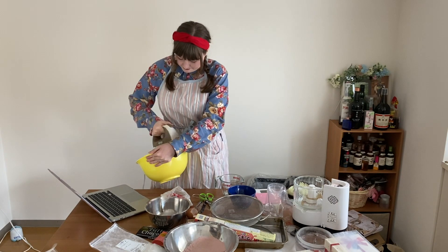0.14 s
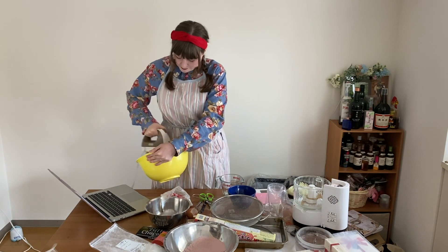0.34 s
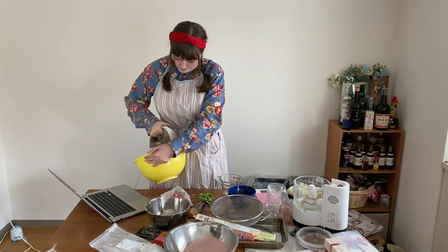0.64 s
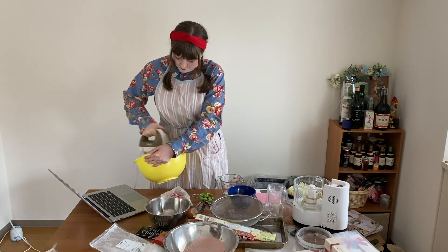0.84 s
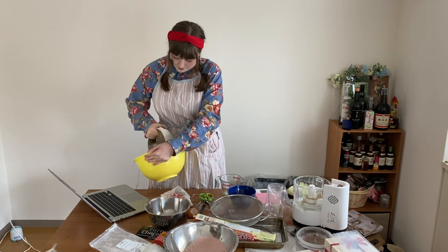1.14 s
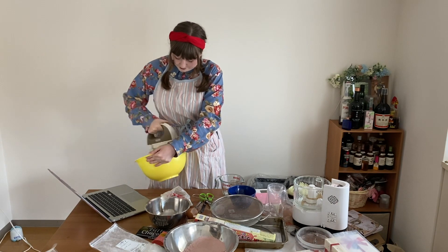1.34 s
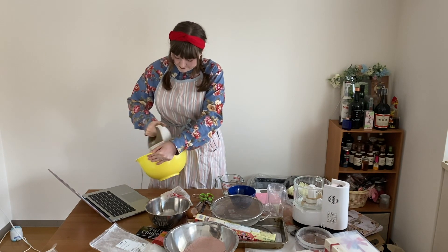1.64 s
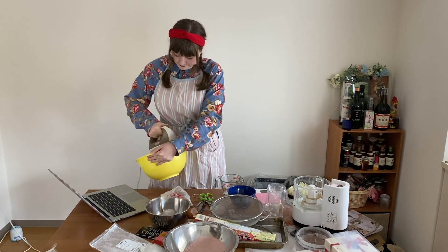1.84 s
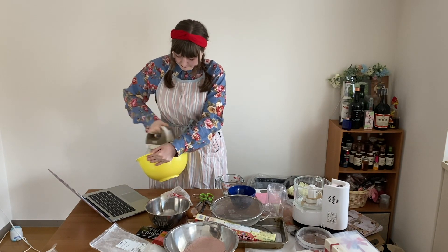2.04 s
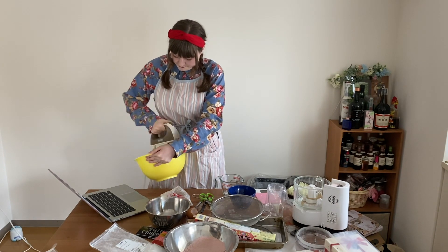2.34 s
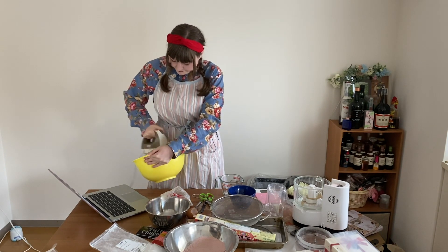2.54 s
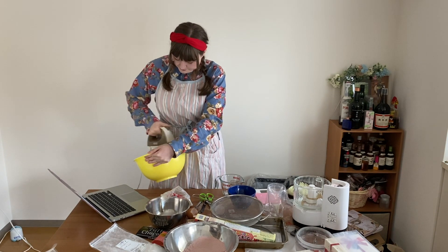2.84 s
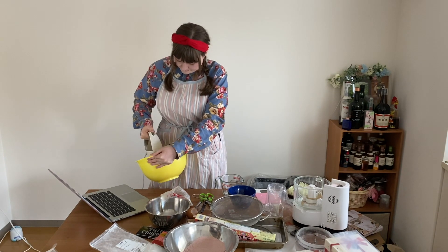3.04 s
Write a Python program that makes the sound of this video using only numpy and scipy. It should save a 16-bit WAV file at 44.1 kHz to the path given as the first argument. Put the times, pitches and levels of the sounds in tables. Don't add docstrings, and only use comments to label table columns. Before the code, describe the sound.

Fast buzzing clatter of an electric whisk in a plastic bowl, swelling and faltering as the hand presses and lifts, over thin gear whine and hiss; soft low knocks, short room echo, microphone a few steps away.

```python
import sys
import numpy as np
from scipy import signal
from scipy.fft import rfft, irfft, next_fast_len
from scipy.io import wavfile
from scipy.ndimage import uniform_filter1d, map_coordinates

SR = 44100
rng = np.random.default_rng(int(sys.argv[2]) if len(sys.argv) > 2 else 0)


def field_ratio(decibels):
    return 10 ** (np.asarray(decibels, dtype=float) / 20)


def store_wav(level_fs):
    pcm = np.round(np.clip(np.atleast_2d(level_fs), -1, 1) * 32767)
    wavfile.write(sys.argv[1], SR, pcm.T.astype(np.int16))


N = 141120
T = np.arange(N) / SR
LEFT_RIGHT = np.array([[1], [-1]])


def unit(x):
    return x / np.sqrt(np.mean(x ** 2) + 1e-20)


def along(points, hz):
    f, v = np.transpose(points)
    return np.interp(np.log(hz + 1), np.log(f + 1), v)


def wobble(knots_per_s):
    return map_coordinates(rng.standard_normal(int(N * knots_per_s / SR) + 4), [T * knots_per_s])


def filtered(x, response):
    m = next_fast_len(N + SR // 4)
    return irfft(rfft(x, m) * response(np.fft.rfftfreq(m, 1 / SR)), m)[..., :N]


def mode(hz, width_hz):
    return lambda f: 1j * f * width_hz / (hz * hz - f * f + 1j * f * width_hz)


def causal(points):
    def response(f):
        cepstrum = irfft(np.log(field_ratio(along(points, f))))
        half = len(cepstrum) // 2
        cepstrum[1:half] *= 2
        cepstrum[half + 1:] = 0
        return np.exp(rfft(cepstrum))
    return response


def coloured(points, peaks, f):
    return field_ratio(along(points, f) + sum(db / (1 + ((f - hz) / w) ** 2) for hz, w, db in peaks))


# (frequency [Hz], correlation [-])
LIKENESS = [(200, 1), (1000, 1), (3500, 0.18), (6000, 0.2), (10000, 0.36), (15000, 0.63)]


def rush(gain):
    def mid_side(f):
        angle = np.arccos(np.clip(along(LIKENESS, f), -1, 1)) / 2
        return gain(f) * [np.cos(angle), np.sin(angle)]
    mid, side = filtered(rng.standard_normal((2, N)), mid_side)
    return unit(np.array([mid + side, mid - side]))


# (time [s], pressure [dB], lead of heavy side [turns], swell per turn [dB])
PRESS = [(0, -24, 0.2, 5.5), (.13, -17, 0.097, 3), (0.298, -15.5, 0.082, 5.5), (0.549, -17.5, -0.062, 5.5),
         (0.651, -14, -0.052, 1.5), (0.749, -16, -0.02, 5), (1.049, -16, 0.0095, 4.5), (1.27, -24, 0.14, 5),
         (1.42, -14.5, 0.23, 4.5), (1.649, -17, .2, 4), (1.902, -19, 0.36, 4), (1.981, -14, .3, 5),
         (2.3, -18.5, .24, 4), (2.418, -15.5, 0.21, 4.5), (2.681, -18, 0.16, 3), (2.799, -15, .2, 4.5),
         (2.931, -18, 0.12, 4), (3.1, -17.5, -0.27, 1.23)]
# (landing time [s], time off [s], loss [dB])
LIFTS = [(0.044, 0.02, 13), (.112, 0.061, 9), (.695, 0.089, 6.5), (1.184, 0.0072, 18), (1.262, 0.016, 37),
         (1.32, 0.018, 17.5), (1.882, 0.032, 4.5), (2.106, 0.0096, 2), (2.309, 0.011, 22),
         (2.608, .014, 10), (2.680, 0.014, 10.5), (2.746, 0.035, 5.5), (2.954, 0.018, 18),
         (3.098, 0.13, 59)]


def contact():
    turns_per_s = 14.0
    second_share, second_lead_turns = 0.47, 0.14
    land_db, land_s = 2.5, .012
    taps_hz, swing_hz, sag_hz, knee_db = 142.75, 20, 7, 1.19
    s, *columns = np.transpose(PRESS)
    press, lead, depth = [np.interp(T, s, c) for c in columns]
    turn = 2 * np.pi * (turns_per_s * T + lead)
    twice = np.cos(2 * turn + 4 * np.pi * second_lead_turns)
    swell = depth * (np.cos(turn) + second_share * twice) + 0.7 * wobble(30.68)

    lift = np.zeros(N)
    for s, off, db in LIFTS:
        lift -= db * np.clip((T - s + off) / (.45 * off), 0, 1) * (T < s)
        if db > 6.5:
            lift += land_db * np.exp(-np.abs(T - s) / land_s) * (T >= s)

    wide = np.clip(depth - 2.3, 0, 2)
    load = 1.4 * wide * np.cos(turn + .3)
    rate = taps_hz + swing_hz * np.tanh(load / knee_db) - sag_hz * wide / 2 * np.sin(turn)
    missing = np.minimum(depth - 3.5, 0)
    return press, swell, lift, rate + 2.3 * wobble(12), missing


def taps(rate):
    jitter_s, spread_db = .00012, 1.5
    scrape_share, scrape_hz, scrape_s = .22, 900, .01
    done = np.cumsum(rate) / SR
    draw = rng.standard_normal((600, 2))[:int(done[-1])]
    at = np.interp(np.arange(len(draw)), done, T) + jitter_s * draw[:, 0]
    at = np.append(at, [s + 0.00019 for s, *_ in LIFTS])
    size = field_ratio(np.append(spread_db * draw[:, 1], np.zeros(len(LIFTS))))
    blows = np.bincount(np.clip(np.round(at * SR), 0, N - 1).astype(int), size, N)
    gate = unit(signal.fftconvolve(blows, np.exp(-T[:900] / scrape_s))[:N])
    scrape = filtered(gate * rng.standard_normal(N),
                      lambda f: (1j * f / scrape_hz / (1 + 1j * f / scrape_hz)) ** 2)
    return np.sqrt(1 - scrape_share) * unit(blows) + np.sqrt(scrape_share) * scrape, gate


def ringing(modes, drive, swell, bright, missing):
    total = 0
    for k, (hz, width_hz, db, follow) in enumerate(modes):
        drive_db = follow * swell + bright * np.log2(max(hz / 1500, 1))
        drive_db = drive_db - 3 * missing * (270 < hz < 600)
        sign = (-1) ** max(k, 3)
        total = total + sign * field_ratio(db) * filtered(drive * field_ratio(drive_db), mode(hz, width_hz))
    return total


# (frequency [Hz], width [Hz], level [dB], swell following [dB/dB])
BOWL_MODES = [(594, 61, -22.5, .3), (654.5, 72, -12, 0.94), (802.5, 31.6, -10.5, 1.79), (874, 83, -6, 0.32),
              (976.7, 55.7, 0, 0.65), (1073, 24, -14, 0.23), (1308, 50, -2, 0.97), (1430, 89.7, 0.5, 1.26),
              (1784, 18.3, -13, 0.3), (1883, 51, -4, 0.43), (2078, 175, -9, 1.15), (2219, 130, -29.5, 0.3),
              (2452, 81, -16, 1.74), (2849, 38, -19.5, 2.1)]
# (frequency [Hz], level [dB])
WALL = [(350, -89), (550, -35), (900, 14), (1500, 3), (2100, -3), (3000, -21.5), (4500, -19), (7000, -38.5)]


def bowl(drive, press, swell, lift, bright, missing):
    held = drive * field_ratio(press + lift)
    strength = np.sqrt(np.mean(field_ratio(press + lift + swell) ** 2))
    modes = unit(ringing(BOWL_MODES, held, swell, bright, missing))
    wall = unit(filtered(held * field_ratio(swell + 0.2 * bright), causal(WALL)))
    return filtered(strength * (modes + field_ratio(-4) * wall), lambda f: (1j * f / 420) ** 3 / (1 + 1j * f / 420) ** 3)


# (frequency [Hz], width [Hz], level [dB], swell following [dB/dB])
HANDLE_MODES = [(231, 23, 3.5, -1.15), (308.6, 12, 0, 0.89), (507, 75, -4, 0.085)]


def handle(drive, press, swell, lift, bright, missing):
    shaken = drive * field_ratio(.3 * (press + lift))
    x = field_ratio(-48.5) * unit(ringing(HANDLE_MODES, shaken, swell, bright, missing))
    return filtered(x, lambda f: (1j * f / 190) ** 2 / (1 - (f / 190) ** 2 + 1.3j * f / 190))


# (frequency [Hz], level [dB])
FIZZ = [(1760, -32), (3000, -2), (3220, -7.5), (4490, -8), (6670, -15), (9580, -11), (13700, -15),
        (15800, -22)]
# (frequency [Hz], width [Hz], level over fizz [dB])
WIRES = [(3660, 37, 3), (4040, 34, 5), (4530, 41, 5.5), (4810, 27, 3.5), (8480, 90, 3.5), (12800, 64, 3.5)]


def wire_fizz(gate, press, swell, lift):
    gate_share = 0.38
    noise = rush(lambda f: coloured(FIZZ, WIRES, f) * (f > 2500))
    noise = noise * (1 - gate_share + gate_share * gate)
    level_db = -33 + 1.22 * (press - press.mean()) + 0.66 * swell
    level_db = level_db + 1.8 * uniform_filter1d(lift, size=2600) + 0.72 * wobble(9.11)
    return field_ratio(level_db) * noise


def whisk():
    press, swell, lift, rate, missing = contact()
    drive, gate = taps(rate)
    bright = 0.98 * (press - press.mean()) + 4.4 * missing
    state = press, swell, lift, bright, missing
    return bowl(drive, *state) + handle(drive, *state), wire_fizz(gate, press, swell, lift)


# (time [s], frequency [Hz])
WHINE = [
    (0, 1430),
    (2.95, 1430),
    (3.1, 1436),
    (3.2, 1382),
]
# (multiple [-], level [dB])
ORDERS = [(.384, -56.5), (1, -45), (2, -59), (3, -60), (10, -64)]


def gear_whine():
    hz = np.interp(T, *np.transpose(WHINE)) * (1 + 0.0011 * wobble(40))
    phase = 2 * np.pi * np.cumsum(hz) / SR
    return sum(field_ratio(db + 3 + 2.5 * wobble(14)) * np.sin(k * phase) for k, db in ORDERS)


# (frequency [Hz], level [dB])
AIR = [(30, -27), (150, -15), (400, -18), (1500, -10), (3500, -13.5), (6300, -19), (13500, -11),
       (15800, -20)]
# (frequency [Hz], width [Hz], level over air [dB])
VENTS = [(8290, 280, 12.5), (12750, 120, 7), (4600, 260, 3)]


def motor_air():
    air = rush(lambda f: coloured(AIR, VENTS, f))
    return field_ratio(-40 + 0.37 * wobble(2.8)) * air


# (time [s], level [dB])
THUMPS = [
    (0.005, -34),
    (.115, -45),
    (.29, -43),
    (1.969, -31),
    (2.41, -43),
    (3.19, -30),
]


def thumps():
    hz, width_s = 45, 0.0086
    return sum(field_ratio(db) * np.exp(-((T - s) / width_s) ** 2) * np.cos(2 * np.pi * hz * (T - s))
               for s, db in THUMPS)


# (frequency [Hz], T60 [s])
ROOM_T60 = [(200, 0.075), (1500, 0.32), (8000, 0.071)]


def kitchen(x):
    hz, t, z = signal.stft(rng.standard_normal((2, SR // 3)), SR, nperseg=256)
    decay = field_ratio(-60 * t / along(ROOM_T60, hz)[:, None])
    tail = signal.istft(z * decay, SR, nperseg=256)[1]
    late = np.pad(x, (300, 0))[None]
    return signal.fftconvolve(late, tail / np.linalg.norm(tail[0]), axes=1)[:, :N]


# (frequency [Hz], left lead [rad])
LEAD = [(0, -4.9), (1120, 0.45), (1640, -1.18), (2930, -0.83), (4050, -0.4), (8960, 1.0), (15600, 0.5)]
# (frequency [Hz], left over right [dB])
PAN = [(60, -12.0), (180, -0.5), (550, 1.5), (1650, 2.5), (4970, 2.0), (15000, 3.5)][1:]


def scene():
    struck, fizz = whisk()
    near = struck + gear_whine() + thumps()
    direct = filtered(near, lambda f: np.exp(.5j * along(LEAD, f) * LEFT_RIGHT))
    both = direct + field_ratio(-12) * kitchen(near) + fizz + motor_air()
    return filtered(both, lambda f: field_ratio(.5 * along(PAN, f) * LEFT_RIGHT))


def band_limit(x):
    return signal.sosfilt(signal.butter(12, 15980, fs=SR, output="sos"), x)


def record(dry):
    soft = dry / (1 + np.abs(dry / .95) ** 6) ** (1 / 6)
    cut = filtered(soft, lambda f: 1 / (1 + (190 / (f + 1)) ** 6) ** .5 + 0.008)
    return band_limit(cut)


dry = scene()
out = record(dry)
store_wav(out)
```